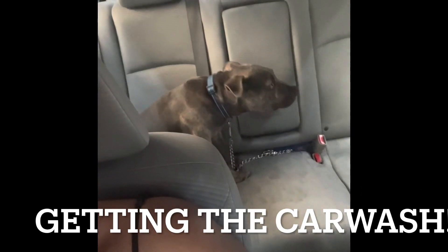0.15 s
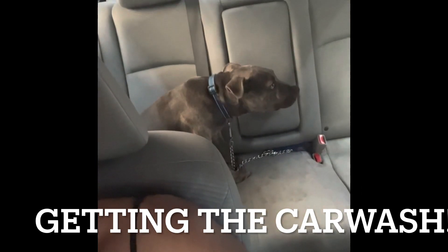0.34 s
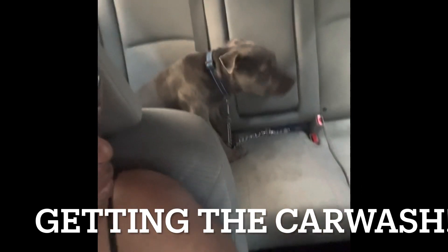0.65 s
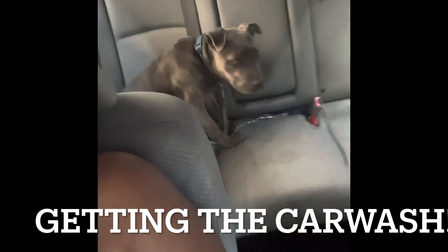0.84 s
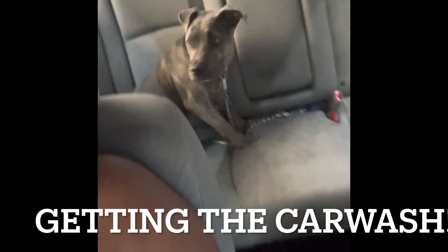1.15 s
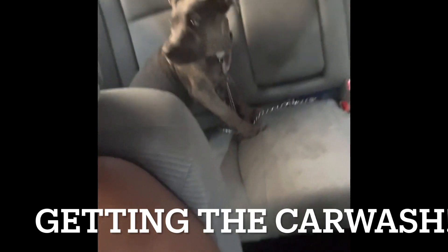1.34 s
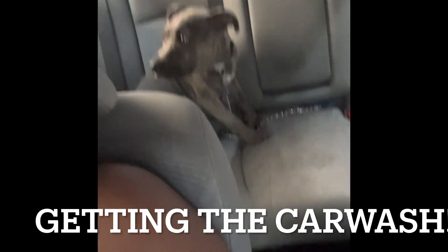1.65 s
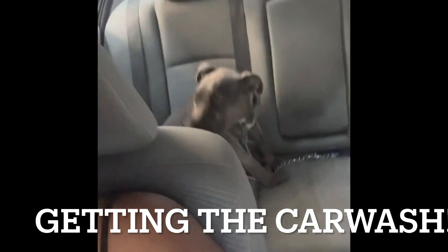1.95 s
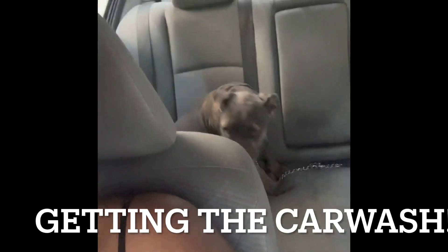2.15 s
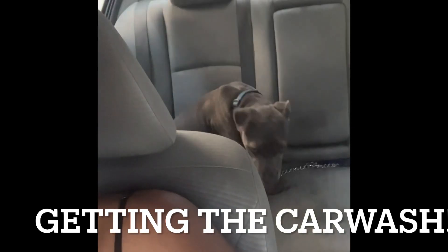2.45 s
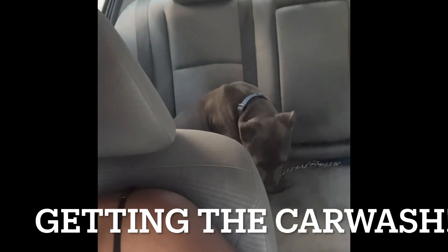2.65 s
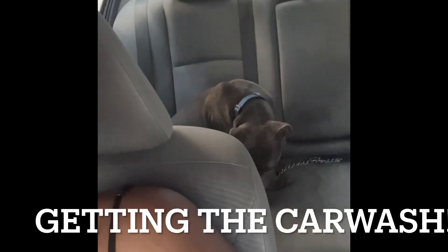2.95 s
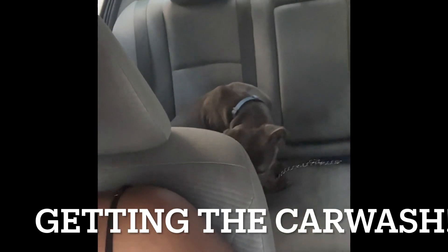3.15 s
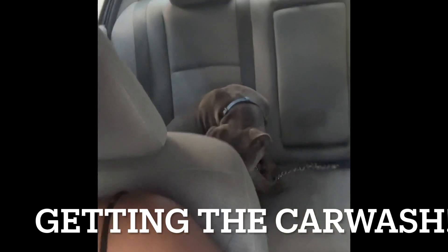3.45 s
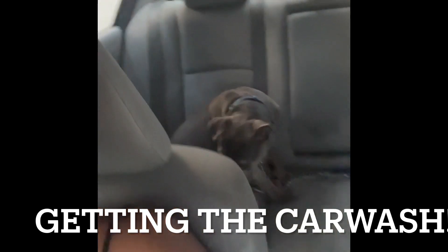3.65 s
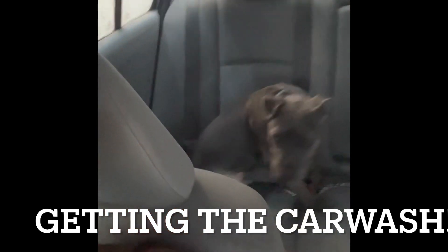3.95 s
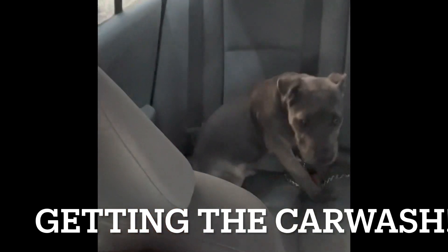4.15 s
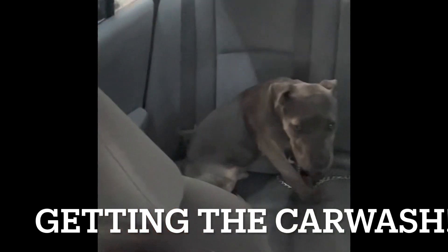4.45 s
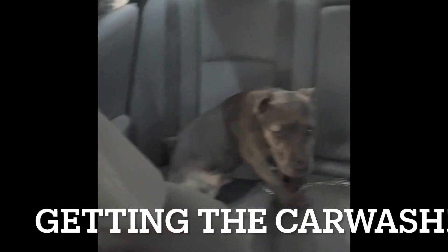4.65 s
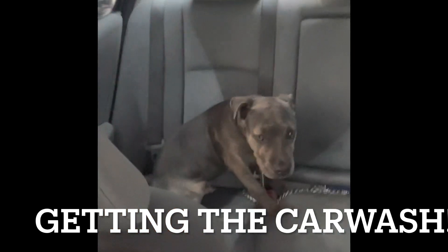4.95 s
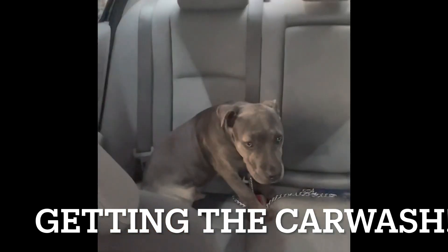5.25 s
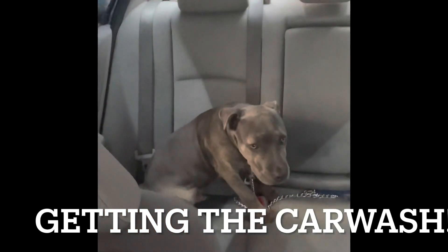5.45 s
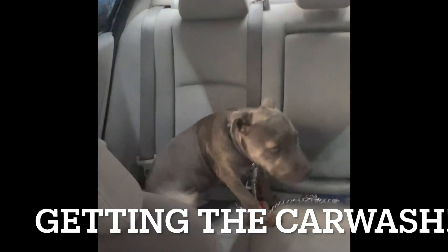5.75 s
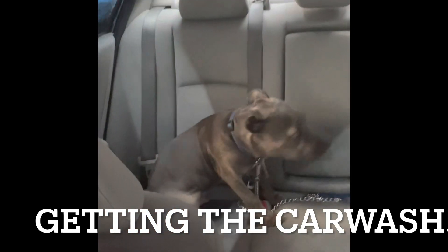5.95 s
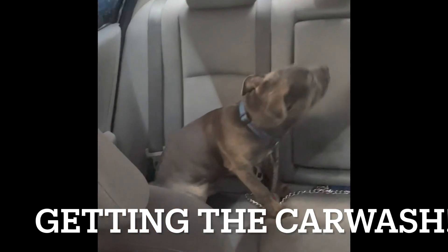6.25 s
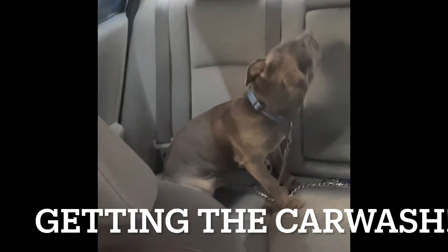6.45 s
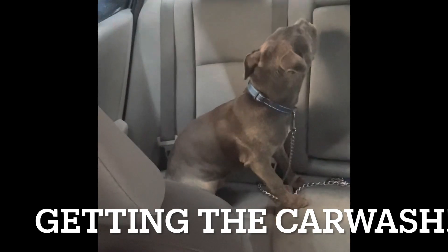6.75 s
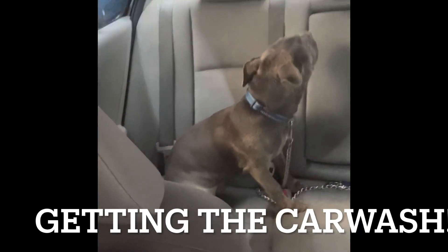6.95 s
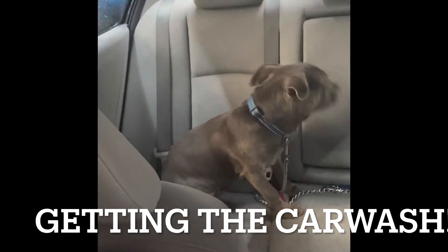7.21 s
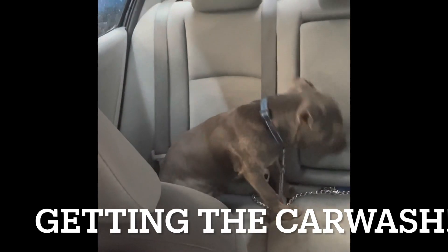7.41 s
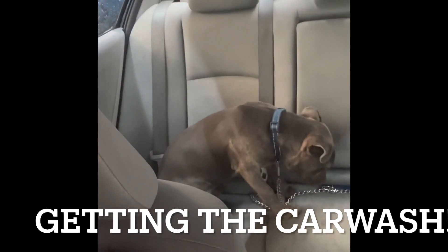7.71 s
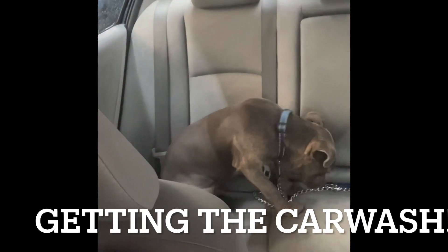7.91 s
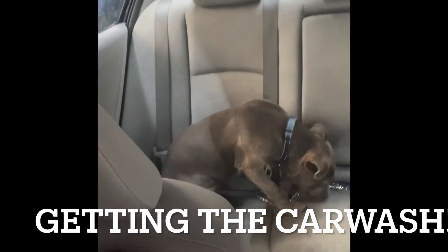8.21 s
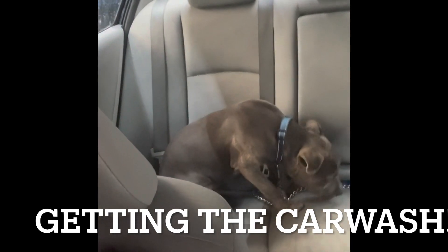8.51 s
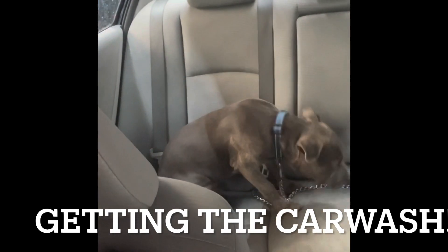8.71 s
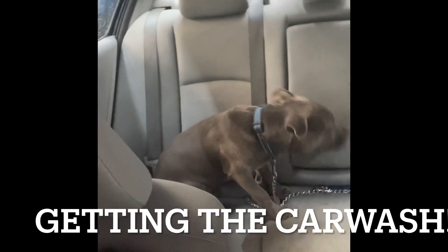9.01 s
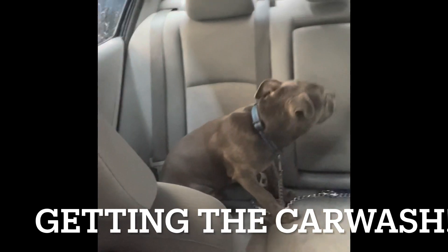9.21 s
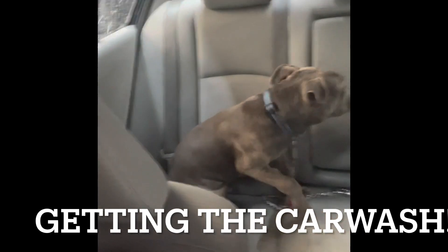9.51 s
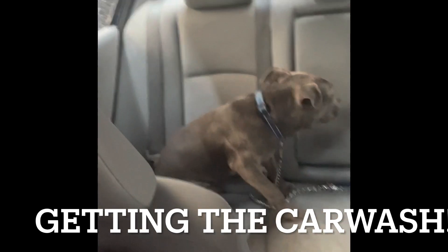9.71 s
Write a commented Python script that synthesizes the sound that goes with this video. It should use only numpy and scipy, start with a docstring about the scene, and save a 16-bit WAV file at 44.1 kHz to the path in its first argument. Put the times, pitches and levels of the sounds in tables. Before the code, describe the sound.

Steady booming and hissing spray heard from a car's cabin, with water slapping the glass, chain clinks and a roof thump.

```python
"""Inside a car in an automatic wash, heard from a phone with two close microphone ports on the front seat.
Jets start at the front: the shell drums, the cabin booms in its low modes, spray hisses, a dog's chain
clinks. From 2.3 s sheets of water slap the glass and ring it. Near 4 s the gantry moves over the roof;
from 5.4 s loose trim rattles, and at 6.7 s the roof thumps. By 7.2 s the jets are at the rear and the
boom has eased; at 8.6 s a brief surge rushes in a door panel."""
import sys
import numpy as np
from scipy import signal
from scipy.fft import rfft, irfft, next_fast_len
from scipy.io import wavfile
from scipy.ndimage import uniform_filter1d, map_coordinates

SR = 44100
rng = np.random.default_rng(int(sys.argv[2]) if len(sys.argv) > 2 else 0)


def wrap_up_sound(samples):
    """Save the sound to the file named by the first command line argument, as 16-bit audio."""
    columns = np.atleast_2d(samples).T
    # keep every value between -1 and 1, then stretch to whole-number steps
    tamed = np.clip(columns, -1, 1)
    steps = np.round(tamed * 32767).astype(np.int16)
    wavfile.write(sys.argv[1], SR, steps)


N = 435266

# gantry position: (time [s], stage [0 front, 1 roof, 2 rear])
GANTRY_STAGE = [(0, 0.036), (3.7, 0.021), (4.3, 1), (6.75, 0.966), (7.2, 1.995), (9.87, 1.8)]
# liveliness of gusts, drops and faint clinks: (time [s], share [0-1])
ACTIVITY = [(0, .8), (3.3, .9), (3.6, .35), (4.6, .4), (5.0, 1), (7.0, 0.9), (7.65, .35), (9.87, .35)]
# noise spectra, each (frequency [Hz], level [dB])
MIST_SPECTRUM = [(4000, -40), (7000, -4), (9500, -1.5), (10500, -3), (11700, -4.5), (12800, -2.5),
                 (13800, -1.5), (15000, -3.5), (15800, -7.5)]  # finest spray
REAR_HISS_SPECTRUM = [(1000, -34.5), (2000, -9.5), (2700, -5.5), (3300, -6), (3900, -5.5), (4400, -8),
                      (4800, -13), (6000, -15.5), (7000, -17.5), (8200, -30.5), (9500, -28), (11000, -40.5),
                      (14000, -76)]  # even wash from behind
IMPACT_SPECTRUM = [(1500, -37), (2500, 1), (3700, 0.5), (5000, -4), (7000, -9), (9500, -20), (12000, -29.5),
                   (16000, -47.5)]  # bright edge of a slap or tap
PANEL_SPECTRUM = [(900, -44), (1350, -5), (1700, 5.5), (2000, -8.5), (2500, -8.5), (3300, -39.5)]  # narrow band of the door panel


def amp(db):
    """Amplitude ratio of a level in decibels."""
    return 10 ** (np.asarray(db) / 20)


def unit(x):
    """Normalisation to rms 1."""
    return x / np.sqrt(np.mean(x ** 2) + 1e-20)


def along(points, hz):
    """Interpolation of (frequency [Hz], value) points on a logarithmic axis."""
    frequencies, values = np.transpose(points)
    return np.interp(np.log(hz + 1), np.log(frequencies + 1), values)


def curves(rows):
    """Linear interpolation in time: one value per sample for each later column."""
    times, *columns = np.transpose(rows)
    return [np.interp(np.arange(N) / SR, times, column) for column in columns]


def wobble(per_s):
    """Slow random modulation: a spline through Gaussian knots."""
    knots = rng.standard_normal(int(N * per_s / SR) + 4)
    return map_coordinates(knots, [np.arange(N) * per_s / SR])


def filtered(x, response):
    """Linear filtering: the spectrum times a frequency response."""
    size = next_fast_len(N + 8192)
    return irfft(rfft(x, size) * response(np.fft.rfftfreq(size, 1 / SR)), size)[..., :N]


def coloured(x, spectrum):
    """Spectral shaping by (frequency [Hz], level [dB]) points, at rms 1."""
    return unit(filtered(x, lambda hz: amp(along(spectrum, hz))))


def water(patchy_db, size=512):
    """Comodulation: two independent noises share random patches of gain in time and frequency."""
    spectra = signal.stft(rng.standard_normal((2, N)), nperseg=size)[2]
    patches = uniform_filter1d(rng.standard_normal(spectra.shape[1:]), size=8, axis=0)
    patches = uniform_filter1d(patches, size=8, axis=1)
    return signal.istft(spectra * amp(patchy_db * unit(patches)), nperseg=size)[1][:, :N]


def drops(per_s, spread_db, t60):
    """Shot-noise envelope: random impulses, a few much larger, each decaying exponentially."""
    chance, size = rng.random((2, N))
    hits = (chance < per_s / SR) * amp(-spread_db * np.log(1 - size))
    return signal.lfilter([1], [1, -amp(-60 / (t60 * SR))], hits)


def around(rows, spread_s):
    """Envelope of agitation: the root of a sum of Gaussian windows, one per event."""
    t = np.arange(0, N, 64) / SR
    windows = sum(amp(db) * np.exp(-((t - s) / spread_s) ** 2) for s, db, *_ in rows)
    return np.interp(np.arange(N) / SR, t, np.sqrt(windows))


def bursts(rows, colours, first_db, rise_s, t60):
    """Decaying noise transients; rows are (time [s], level [dB], offsets of the later colours [dB])."""
    envelopes, t = np.zeros((len(colours), N + SR)), np.arange(SR // 6) / SR
    pulse = amp(-60 * t / t60) * (1 - np.exp(-t / rise_s))
    for s, db, *offsets_db in rows:
        start = round(s * SR)
        envelopes[:, start:start + len(t)] += amp(db) * amp([first_db, *offsets_db])[:, None] * pulse
    return sum(envelope[:N] * coloured(rng.standard_normal((2, N)), colour)
               for envelope, colour in zip(envelopes, colours))


def knocks(rows, modes, rise_s, pitch=1, lasting=1):
    """Modal superposition: each impact rings damped sines, scattered in level and tuning."""
    out, t = np.zeros((2, N + SR)), np.arange(SR // 4) / SR
    scatter = rng.standard_normal((len(rows), 2, len(modes), 2))
    each = np.ones(len(rows))
    for (s, db, *_), (alike, apart), scale, stretch in zip(rows, scatter, pitch * each, lasting * each):
        for side, draws in zip(out, (alike, 0.94 * alike + .6 * apart)):
            ring = sum(amp(level + 1.8 * louder - 60 * t / (stretch * t60))
                       * np.sin(2 * np.pi * scale * hz * (1 + 0.015 * detune) * t)
                       for (hz, level, t60), (louder, detune) in zip(modes, draws))
            side[round(s * SR):][:len(t)] += amp(db) * ring * (1 - np.exp(-t / rise_s))
    return out[:, :N]


def door_surge(start_s=8.6, rise_s=.12, hold_s=.14, fall_s=0.16):
    """Band-pass resonance: a surge of water rushes in a narrow band of the door panel."""
    corners = start_s + np.cumsum([0, rise_s, hold_s, fall_s])
    envelope = np.interp(np.arange(N) / SR, corners, [0, 1, 1, 0])
    rush = amp(-43) * coloured(water(patchy_db=3.0), PANEL_SPECTRUM)
    hiss = amp(-55) * coloured(water(patchy_db=1.0), REAR_HISS_SPECTRUM)
    return envelope * (rush + hiss)


def glass_spray():
    """Amplitude modulation: the same gusts and drops move three noise bands of spray on glass."""
    # (time [s], spray level [dB], hiss level [dB], mist level [dB])
    levels = [(0, -36.5, -44, -60), (.7, -36, -44.5, -60.5), (1.25, -36.5, -46, -61),
              (1.75, -35, -43.5, -57), (2.45, -37, -45.5, -55), (2.75, -36, -46, -60),
              (3.3, -35.5, -47, -60), (3.8, -35.5, -47, -58.5), (4.15, -42, -49.5, -63.5),
              (4.6, -40.5, -48, -63), (5.2, -40.5, -48, -64), (6.2, -40.5, -49.5, -66.5),
              (6.8, -42, -50, -65), (7.2, -43, -51, -65.5), (8.2, -41.5, -51.5, -69),
              (9.0, -41.5, -50, -66), (9.87, -42, -52, -69.5)]
    # spectra by jet position, each (frequency [Hz], level [dB])
    spray_near = [(500, -39.5), (900, -5), (1400, -3), (1800, -5), (2200, -7.5), (2700, -15), (3500, -26),
                  (5000, -45.5), (9000, -92.5)]
    spray_far = [(500, -42), (900, -2.5), (1300, -4.5), (1700, -6), (2000, -12.5), (2500, -16),
                 (3500, -38.5), (5000, -53.5), (9000, -92.5)]  # duller once the jets leave the windscreen
    hiss_front = [(1000, -34.5), (2000, -8.5), (2700, -5), (3300, -4.5), (3900, -7), (4400, -9.5),
                  (5000, -13.5), (6000, -16), (7000, -16.5), (8200, -29), (9500, -26), (11000, -42.5),
                  (14000, -76.5)]
    hiss_roof = [(1000, -36.5), (2000, -8), (2700, -4.5), (3300, -5.5), (3900, -6), (4400, -9), (5000, -11),
                 (6000, -10.5), (7000, -13), (8200, -19.5), (9500, -21), (11000, -41.5), (14000, -70)]  # brighter overhead
    spray_db, hiss_db, mist_db = curves(levels)
    stage, = curves(GANTRY_STAGE)
    front, roof, rear = np.clip(1 - stage, 0, 1), 1 - abs(stage - 1), np.clip(stage - 1, 0, 1)
    activity, = curves(ACTIVITY)
    gust = activity * (wobble(6.8) + 1.4 * wobble(20))
    patter = activity * drops(per_s=67, spread_db=4, t60=0.075)
    coarse = water(patchy_db=1.64) * (1 + 0.13 * patter)
    spray = front * coloured(coarse, spray_near) + (1 - front) * coloured(coarse, spray_far)
    fine = water(patchy_db=1.4) * (1 + 0.19 * patter)
    hiss = (roof * coloured(fine, hiss_roof) + front * coloured(fine, hiss_front)
            + rear * coloured(fine, REAR_HISS_SPECTRUM))
    mist = coloured(water(patchy_db=0.0) * (1 + 0.36 * patter), MIST_SPECTRUM)
    return (amp(spray_db + 0.32 * gust) * spray + amp(hiss_db + 0.44 * gust) * hiss
            + amp(mist_db + .45 * gust) * mist)


def dog_chain(faint_per_s=2.6, faint_until_s=7.6):
    """Free vibration: colliding metal links tick and ring in short inharmonic modes."""
    # (time [s], level [dB], sparkle offset [dB], pitch [Hz])
    loud = [(.149, -37, -9.5, 3670), (.358, -37.5, -21, 3820), (.397, -34, -25.5, 3840),
            (.563, -26.5, -21.5, 3740), (.633, -29, -24.5, 3820), (.668, -31.5, -22.5, 3930),
            (.689, -35.5, -21.5, 4000), (.875, -37, -21.5, 3890), (1.052, -28.5, -26.5, 3880),
            (1.544, -33, -12.5, 3770), (1.595, -32.5, -17, 3560), (1.706, -35.5, -15.5, 4028),
            (1.965, -35.5, -21, 3510), (2.037, -34, -14.5, 3210), (3.721, -38.5, -16, 3600),
            (4.212, -39, -19.5, 3580), (4.74, -39.5, -20, 3500), (4.937, -36, -23, 4058),
            (5.129, -25.5, -24.5, 3870), (5.287, -36, -21.5, 3670), (5.414, -33, -24, 3710),
            (5.449, -39, -22.5, 3890), (5.474, -34.5, -22.5, 4080), (5.497, -33, -24, 4300),
            (5.507, -25.5, -25.5, 4200), (5.514, -26.5, -30, 4350), (5.54, -30.5, -25.5, 4010),
            (5.637, -35.5, -20.5, 4850), (5.701, -31.5, -28.5, 5150), (5.903, -33, -21, 3602),
            (5.925, -36, -18.5, 4080), (6.021, -37, -22, 4300), (6.054, -35, -23, 3870),
            (6.078, -30, -26.5, 3640), (6.095, -35, -23, 4400), (6.148, -35.5, -19.5, 3650),
            (6.213, -25, -35, 4220), (6.246, -31, -28, 4200), (6.318, -36, -25, 4240),
            (6.36, -39.5, -23, 4730), (6.396, -39.5, -21.5, 5500), (6.461, -36, -22.5, 4820),
            (6.487, -34, -21, 3460), (6.696, -31, -26, 3630), (6.915, -35, -15, 3180),
            (6.963, -35.5, -26, 4150), (7.026, -35, -25, 4130), (7.061, -28, -24.5, 4300),
            (7.143, -29, -18.5, 4800), (7.226, -36, -22.5, 4000), (7.396, -29, -20, 3958),
            (7.485, -32.5, -16, 3320), (7.497, -31, -22, 4042), (7.514, -40, -8, 3210),
            (7.524, -34.5, -9, 2850), (7.549, -27.5, -15.5, 3470), (7.575, -36.5, -9, 4720),
            (9.05, -43, -5.5, 4170)]
    # contact noise, each (frequency [Hz], level [dB])
    tick_spectrum = [(1500, -31), (2800, -3.5), (3700, -1), (4300, -3.5), (5200, -5.5), (6500, -7.5),
                     (7500, -16), (9000, -44)]
    sparkle_spectrum = [(6000, -30), (7500, 2), (9500, 1), (11500, -2), (13800, 0), (15000, -2),
                        (15800, -7)]
    # (ratio to the pitch, level [dB], base t60 [s])
    link_modes = [(.82, -7.5, 0.014), (.91, -6, 0.017), (1, -1.5, 0.023), (1.12, -5, .017),
                  (1.29, -6.5, 0.014), (1.5, -9.5, 0.0088), (1.69, -9, 0.01)]
    # links ring long hanging free, short lying on the seat: (time [s], t60 factor)
    slack = [(0, 1.8), (2.1, 1.6), (4.9, 0.86), (6.8, 0.88), (7.6, .75)]
    # faint clinks fall at random while the dog moves about
    gap, size, sparkle, pitch = rng.random((40, 4)).T
    times = np.cumsum(-np.log(1 - gap)) / faint_per_s
    activity = np.clip(np.interp(times, *np.transpose(ACTIVITY)), .05, 1)
    faint_db = -38 + 5 * (size - .5) + 20 * np.log10(activity)
    faint = np.transpose([times, faint_db, -20 + 7 * (sparkle - .5), 3630 * (1 + .25 * (pitch - .5))])
    clinks = np.vstack([loud, faint[times < faint_until_s]])
    ticks = bursts(clinks[:, :-1], (tick_spectrum, sparkle_spectrum),
                   first_db=-5.0, rise_s=0.0013, t60=0.033)
    lasting = np.interp(clinks[:, 0], *np.transpose(slack))
    ring = knocks(clinks, link_modes, rise_s=0.0014, pitch=clinks[:, -1], lasting=lasting)
    return ticks + amp(-0.5) * ring


def window_slaps():
    """Impact excitation: sheets of water splash and ring the pane; droplets crackle around them."""
    # (time [s], level [dB], low body offset [dB], fine top offset [dB])
    slaps = [(2.329, -32, -4, -17.5), (2.419, -44, 1, -18), (2.513, -32.5, 1.5, -25), (2.56, -36, 0, -24),
             (2.527, -28, 1, -23), (2.586, -24.5, -7.5, -27.5), (2.62, -26.5, -2.5, -20.5),
             (2.689, -25, -3.5, -11), (2.699, -30.5, -1.5, -17.5), (2.741, -35, 1, -22),
             (2.722, -37, -6.5, -10), (2.758, -22.5, -18.5, -14.5), (2.798, -26.5, -1.5, -19),
             (2.866, -29, 0, -22.5), (2.9, -31, 0.5, -16), (2.975, -27.5, 4, -17.5),
             (3.031, -29.5, -8, -11.5), (3.061, -31.5, -3, -23), (3.109, -34, -0.5, -24.5),
             (3.167, -34, -0.5, -25.5), (3.229, -28, -1.5, -16.5), (3.25, -32.5, 0, -20),
             (3.272, -38, -6, -20.5), (3.411, -32, -0.5, -16.5), (3.449, -34.5, 0.5, -31)]
    # low body of a slap: (frequency [Hz], level [dB])
    low_spectrum = [(800, -27.5), (1400, -9), (2000, 7), (2600, 0), (3500, -27.5)]
    # (frequency [Hz], level [dB], t60 [s])
    pane_modes = [(2040, -2.5, 0.04), (2337, 1.5, 0.06), (3100, -1, 0.035), (3790, -3.5, 0.04)]
    sheets = bursts(slaps, (IMPACT_SPECTRUM, low_spectrum, MIST_SPECTRUM),
                    first_db=-7.0, rise_s=0.002, t60=0.075)
    spatter = drops(per_s=89, spread_db=3.5, t60=0.034) * rng.standard_normal((2, N))
    pane = lambda f: sum(amp(db) / (1 + ((f - hz) / 170) ** 2) for hz, db, _ in pane_modes)
    crackle = amp(-36) * around(slaps, spread_s=.06) * unit(filtered(spatter, pane))
    return sheets + crackle + amp(-4.5) * knocks(slaps, pane_modes, rise_s=0.0018)


def trim_rattle(chatter_hz=1480):
    """Intermittent contact: loose trim knocks and chatters in damped modes, with a dry bright edge."""
    # (time [s], level [dB], pitch [Hz])
    rattles = [(5.414, -28.5, 1440), (5.449, -33.5, 1450), (5.474, -28.5, 1450), (5.497, -25.5, 1500),
               (5.507, -16.5, 1550), (5.513, -12.5, 1514), (5.541, -21, 1480), (5.555, -30, 1390),
               (5.568, -30.5, 1450), (5.588, -31, 1450), (5.61, -26.5, 1379), (5.649, -24.5, 1620),
               (5.697, -25, 1480), (5.903, -22, 1550), (5.927, -18.5, 1550), (6.044, -29, 1460),
               (6.075, -26, 1490), (6.215, -17.5, 1480), (6.246, -22, 1530), (6.318, -31.5, 1601),
               (6.487, -27.5, 1720), (6.961, -25.5, 1569), (7.027, -26, 1450), (7.062, -21, 1510),
               (7.218, -29, 1700), (7.395, -26, 1650), (7.576, -24, 1670)]
    # (ratio to the pitch, level [dB], t60 [s])
    trim_modes = [(.83, -8.5, 0.014), (.94, -0.5, 0.016), (1.02, 2, 0.022), (1.12, -5.5, 0.016),
                  (1.3, -13, 0.012)]
    taps = drops(per_s=170, spread_db=1.0, t60=0.023) * rng.standard_normal((2, N))
    trim = lambda f: sum(amp(db) / (1 + ((f - chatter_hz * ratio) / 110) ** 2)
                         for ratio, db, _ in trim_modes)
    ringing_taps = unit(filtered(taps, trim)) + amp(-14.0) * coloured(taps, IMPACT_SPECTRUM)
    chatter = amp(-39) * around(rattles, spread_s=0.19) * ringing_taps
    hits = np.array(rattles)
    clack = bursts(hits[:, :-1], (PANEL_SPECTRUM,), first_db=-10.5, rise_s=0.0014, t60=.025)
    return knocks(hits, trim_modes, rise_s=0.0011, pitch=hits[:, -1]) + clack + chatter


def roof_thump():
    """Damped panel vibration: one dull blow rings the roof's low modes."""
    # (time [s], level [dB])
    thumps = [(6.697, -9)]
    # (frequency [Hz], level [dB], t60 [s])
    thud_modes = [(111, -6, 0.15), (180, -4.5, .2), (242, 2, 0.23), (291, -5, 0.15)]
    return knocks(thumps, thud_modes, rise_s=0.01)


def jets_on_shell(boom_edge_hz=160, drum_edge_hz=450):
    """Forced vibration: jets shake the shell, and each gantry stage drives its own resonances."""
    # (time [s], boom level [dB], drumming level [dB], rush level [dB])
    levels = [(0, -19.5, -25, -28.5), (.5, -14.5, -25, -29), (.95, -17, -25, -30.5), (1.3, -15.5, -25, -32),
              (1.7, -19, -27.5, -31.5), (2.15, -14.5, -26, -32.5), (2.6, -18.5, -26, -31),
              (3.1, -19.5, -22.5, -29.5), (3.75, -21.5, -25, -30), (4.0, -23, -26.5, -37),
              (4.25, -24, -23.5, -31), (4.55, -18.5, -23, -33), (5.2, -17, -24, -33),
              (5.7, -18.5, -20.5, -32), (6.72, -18.5, -22.5, -31), (6.85, -20, -24.5, -35),
              (7.15, -26, -30.5, -33.5), (7.36, -26, -29.5, -32.5), (7.42, -24, -27.5, -31.5),
              (7.7, -29, -26.5, -31.5), (8.3, -26.5, -25.5, -33.5), (9.0, -29, -25, -30.5),
              (9.87, -27.5, -23, -32)]
    # broad colour of the shell: (frequency [Hz], level [dB])
    shell_spectrum = [(15, -30.5), (25, -11), (33, -8), (45, 4), (100, -1), (155, -3), (220, 0.5),
                      (400, -6), (800, -12.5), (1200, -18), (1800, -29), (3000, -45.5), (6000, -88.5)]
    # modes of panels and cabin air, each (frequency [Hz], width [Hz], level [dB])
    front_modes = [(58.4, 26, 12.5), (123.1, 22, 17.5), (174, 34, 8), (201, 36, 5), (304, 56, 4),
                   (371.7, 9.2, 6.5), (691, 34, 4), (787.5, 22, 7), (945, 35, 4.5)]
    roof_modes = [(67.3, 19, 16.2), (101.3, 24, 21.5), (115, 13, 19.4), (176.3, 23, 14), (217, 22, 8),
                  (243.3, 16, 12.8), (325.7, 24, 10.1), (515, 16, 4), (545.6, 28, 6), (700, 17, 1.1),
                  (1055, 67, 1.4)]
    rear_modes = [(59, 8.7, 8.7), (122, 18, 11.4), (179, 23, 7.3), (248.4, 32, 6), (299, 85, 2.9),
                  (440, 82, 3.7), (657, 64, 3.6), (780, 61, 4), (1022, 23, 7.8)]
    # the boom slides in pitch as the jets move over the panels: (time [s], pitch factor)
    slide = [(0, .99), (1, 1.013), (1.4, 1.07), (2.1, 0.99), (2.6, 1.1), (3.6, 1.01), (4.1, 0.95),
             (4.6, 1.04), (5.1, .98), (6.2, .97), (6.7, 0.99), (7.2, 1.033), (9.87, 1.006)]
    stage, = curves(GANTRY_STAGE)
    boom_db, drum_db, rush_db = curves(levels)
    read_at = np.cumsum(*curves(slide))
    below = lambda f, edge: 1 / (1 + (f / edge) ** 8)
    crossover = lambda f: np.sqrt([below(f, boom_edge_hz),
                                   below(f, drum_edge_hz) - below(f, boom_edge_hz),
                                   1 - below(f, drum_edge_hz)])[:, None]
    bands = 0
    for k, modes in enumerate((front_modes, roof_modes, rear_modes)):
        share = np.sqrt(np.clip(1 - abs(stage - k), 0, 1))  # equal-power crossfade
        resonance = lambda f: np.sqrt(1 + sum(amp(2 * db) / (1 + (1.13 * (f - hz) / width) ** 2) ** 2
                                              for hz, width, db in modes))
        response = lambda f: crossover(f) * resonance(f) * amp(along(shell_spectrum, f))
        jet = filtered(water(patchy_db=1.0, size=4096), response)
        jet[0] = [np.interp(read_at, np.arange(N), side, period=N) for side in jet[0]]
        bands = bands + share * np.array([unit(band) for band in jet])
    boom, drum, rush = bands
    return (amp(boom_db + 0.49 * wobble(7.4)) * boom + amp(drum_db + 0.66 * wobble(5)) * drum
            + amp(rush_db + 0.6 * wobble(9)) * rush)


def stereo_image(pair):
    """Partial coherence: two signals mix as sum and difference, then left and right part in level
    and phase. At 8-10 kHz the hiss is in pure antiphase and cancels in mono."""
    # likeness of left and right in the stereo sound: (frequency [Hz], coherence [0-1])
    coherence = [(100, .9995), (180, .99), (280, .94), (500, .7), (1000, .64), (2500, .66), (3600, .3),
                 (4500, .25), (5500, .72), (7400, .7), (8300, .9995), (10200, .9995), (11500, .4),
                 (12300, .6), (13000, .998)]
    # left over right: (frequency [Hz], level [dB])
    left_level = [(60, .4), (140, 1), (210, 2), (330, 3.5), (500, 4.7), (1200, 5.3), (1800, 5.5),
                  (2700, 2.8), (4200, 1), (6400, .5), (8000, 0), (15000, 0)]
    # left ahead of right: (frequency [Hz], phase [rad])
    left_phase = [(330, 0), (1000, -.8), (2000, -1.8), (2900, -2.5), (3800, -1.5), (4650, 2), (5700, 1.2),
                  (7000, 2), (8000, 3.14), (10500, 3.14), (11500, 4.8), (12600, 6.2), (13000, 6.28)]
    angle = lambda hz: np.arccos(np.clip(along(coherence, hz), 0, 1)) / 2
    shared, apart = filtered(pair, lambda hz: np.array([np.cos(angle(hz)), np.sin(angle(hz))]))
    side = np.array([[.5], [-.5]])
    offset = lambda hz: amp(side * along(left_level, hz)) * np.exp(1j * side * along(left_phase, hz))
    return filtered(np.array([shared + apart, shared - apart]), offset)


def scene():
    """Superposition: all sources in the cabin add into one stereo sound."""
    wash = jets_on_shell() + glass_spray() + door_surge() + window_slaps()
    return stereo_image(wash + dog_chain() + trim_rattle() + roof_thump())


def record(dry):
    """Band limiting: the phone passes nothing above its cutoff."""
    return filtered(dry, lambda hz: hz < 15730)


dry = scene()
out = record(dry)
wrap_up_sound(out)
```